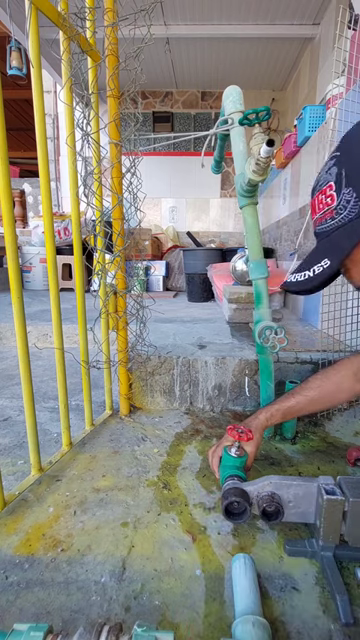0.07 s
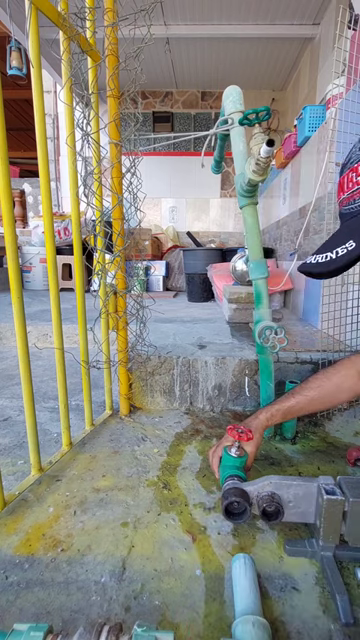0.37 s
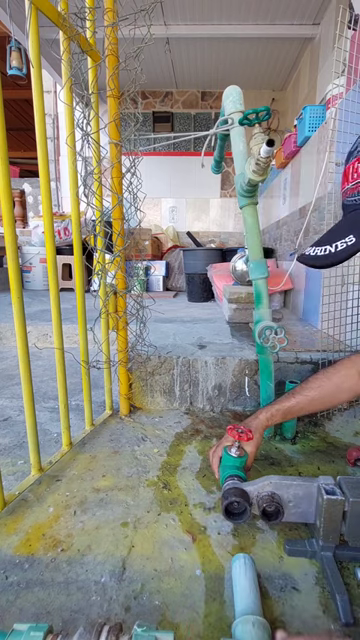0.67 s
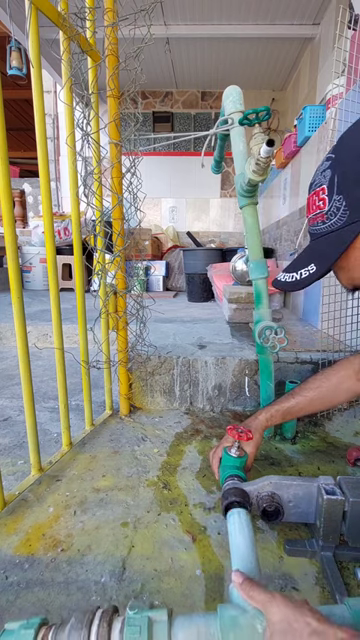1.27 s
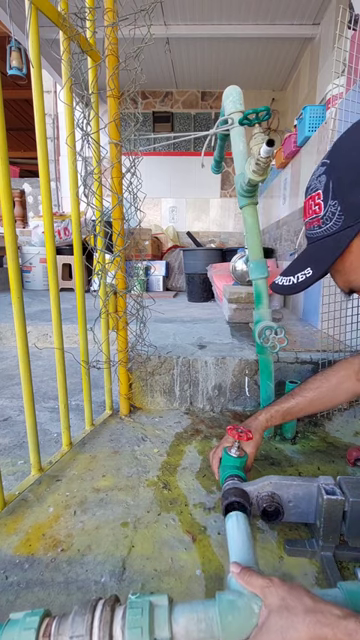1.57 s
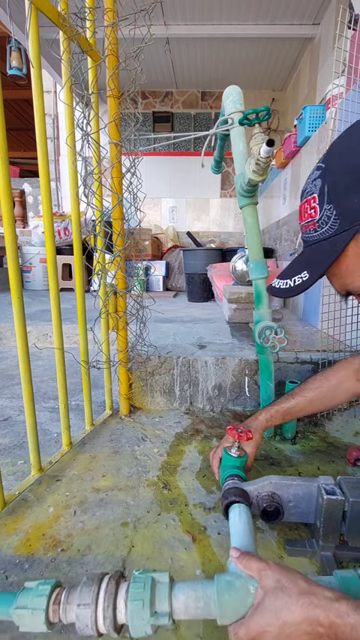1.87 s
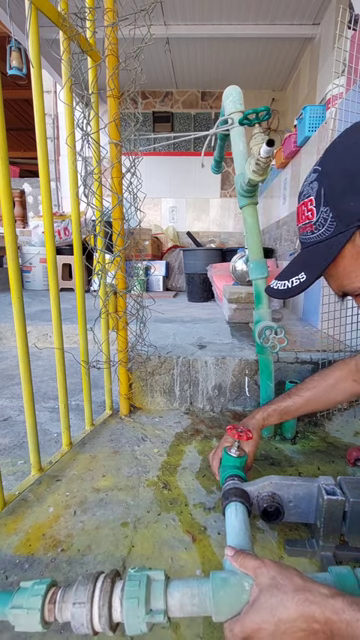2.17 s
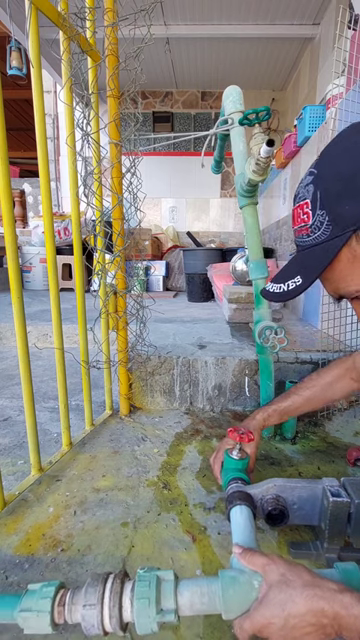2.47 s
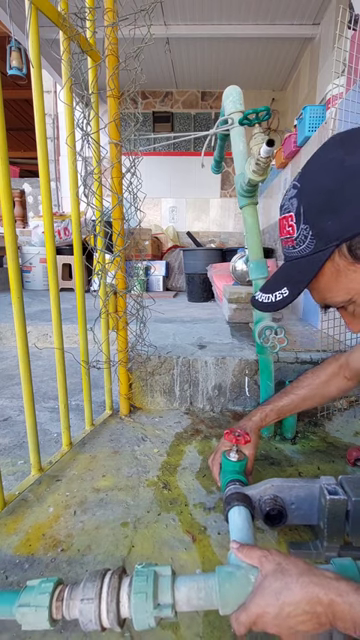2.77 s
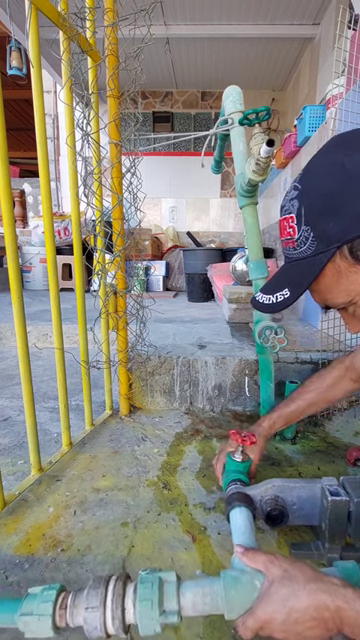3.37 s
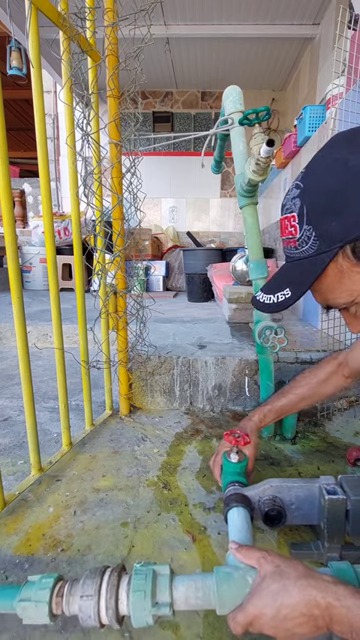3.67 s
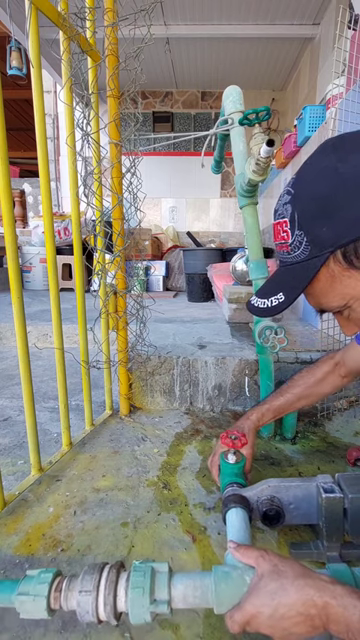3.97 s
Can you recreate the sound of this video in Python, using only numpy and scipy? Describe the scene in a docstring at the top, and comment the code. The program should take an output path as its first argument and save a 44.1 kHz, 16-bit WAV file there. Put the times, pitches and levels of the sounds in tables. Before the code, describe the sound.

A high, wavering hiss of water rushing into a plastic pipe follows some quiet handling: hollow knocks, a dull thump and the clack of a valve. It is heard up close in a roofed space with a low background rumble.

```python
"""Water let into a plastic pipe

A plastic pipe is pushed into a fitting on a concrete floor under a roof: scuffs, hollow knocks and a
thump as it seats, each blow exciting damped modes. A valve cracks open and air sputters out; turbulent
water hisses through the gap and drives the pipe's resonances. A low rumble lies underneath, with two
thin rising chirps and a faint level one, perhaps from a small bird."""
import sys
import numpy as np
from scipy import signal
from scipy.fft import rfft, irfft
from scipy.io import wavfile

SR = 44100
rng = np.random.default_rng(int(sys.argv[2]) if len(sys.argv) > 2 else 0)


def inscribe(sig):
    """Save sig as 16-bit PCM at rate SR to the path in sys.argv[1].

    A 1-D sig is mono; a 2-D sig holds one channel per row.
    Samples are clipped to [-1, 1] before scaling.
    """
    pcm = np.round(np.clip(np.atleast_2d(sig).T, -1, 1) * 32767)
    wavfile.write(sys.argv[1], SR, pcm.astype(np.int16))


N = 176400
T = np.arange(N) / SR
HZ = np.maximum(np.fft.rfftfreq(N, 1 / SR), 1)
CUTOFF_HZ = 15750
LAG_S = 0.000284   # valve and fitting are on the right, so the left hears them late

# Jet strength as the valve turns. Each row: time in seconds, treble and middle gains in dB.
JET_LEVELS = [(2.275, -60, -56.5), (2.326, -47.5, -57.5), (2.444, -36.5, -50), (2.5, -33.5, -46.5),
              (2.56, -30, -44.5), (2.665, -33.5, -49.5), (2.745, -29.5, -48), (2.82, -31.5, -45),
              (2.9, -32.5, -48), (3.02, -33, -49), (3.185, -41.5, -50.5), (3.285, -34.5, -50),
              (3.37, -35.5, -46.5), (3.46, -34.5, -51), (3.51, -38, -48.5), (3.6, -36.5, -51.5),
              (4, -38, -51.5)]
# Jet spectrum. Each row: frequency in Hz, relative density in dB.
JET_SPECTRUM = [(1000, -22.5), (2400, -20.5), (3250, -19.5), (3450, -10), (3700, -13.5), (4250, -9.5),
                (5750, -8.5), (6300, -8), (7600, -8.5), (8900, -7.5), (10900, -3.5), (12000, -3),
                (15600, 1)]
# Direction of the jet. Each row: frequency in Hz, left minus right in dB.
JET_PAN = [(3300, 1.5), (4400, -6.5), (6300, -3), (7700, -7.5), (8900, 2), (10000, -4.5), (13400, -11),
           (15500, -7)]
# Likeness of the jet's two sides. Each row: frequency in Hz, coherence from 0 to 1.
JET_COHERENCE = [(2000, 0.49), (5000, 0.61), (12000, 0.13), (16000, 0.39)]
# Resonances of the valve gap. Each row: frequency in Hz, width in Hz, relative level in dB.
GAP_MODES = [(6400, 110, -26.5), (10100, 280, -15.5), (11600, 50, -18), (11900, 58, -17), (13440, 120, -17)]
# The gap sings as the valve moves. Each row: centre and spread in seconds, pitch in Hz, level in dB.
GAP_SINGS = [(2.54, 0.069, 12500, -36), (2.79, 0.029, 12000, -35.5), (3.28, .035, 13000, -38)]
# Reflections off the floor and nearby pipes.
# Each row: left-side delay in seconds (the right's is 1.17 times longer), gain in dB.
REFLECTIONS = [(.0019, -17), (.0051, -15), (.0093, -16)]
# Turbulence inside the pipe. Each row: time in seconds, level in dB.
CHURN_LEVELS = [(2.26, -64), (2.33, -61.5), (2.46, -49), (2.56, -58), (2.7, -58), (2.78, -55),
                (3.08, -59.5), (3.2, -52), (3.26, -57.5), (3.33, -46), (3.41, -47), (3.5, -56),
                (3.57, -47.5), (3.72, -58.5), (4, -58.5)]
# Resonances of the pipe. Each row: frequency in Hz, width in Hz, relative level in dB.
PIPE_MODES = [(540, 130, -7.5), (600, 28, 4), (718, 34, 0.5), (750, 32, 2.5), (1000, 300, -14),
              (1230, 17, -3), (1539, 18, 2), (1817, 32, 6.5), (1930, 17, 3.5), (2660, 54, -5),
              (2825, 16, 0.5), (3015, 10, 3.5)]
# Air escaping ahead of the water. Each row: time in seconds, level in dB.
SPUTTER_LEVELS = [(2.27, -82), (2.3, -50.5), (2.34, -53.5), (2.355, -44.5), (2.375, -55.5), (2.485, -53.5),
                  (2.55, -89)]
# Blows: the pipe knocks on the fitting, it bottoms out in its socket, the valve breaks free.
# Each row: start in seconds, gain in dB, low-pass corner in Hz, pitch ratio.
FITTING_BLOWS = [(.959, -31.5, 3500, 1.12), (.9695, -42, 6000, 1.1), (.9995, -29.5, 1690, 1.0),
                 (1.0295, -38.5, 2800, 1.0), (1.037, -43, 900, 0.73), (3.065, -41, 2500, 0.66)]
SEATING_BLOWS = [(1.943, -30.5, 800, 0.96)]
VALVE_BLOWS = [(2.2185, -29.5, 6940, 0.95)]
# Their modes. Each row: frequency in Hz at pitch ratio 1, relative level in dB, 60 dB decay in seconds.
FITTING_MODES = [(380, -15.5, 0.084), (459, 2, 0.04), (557, 2.5, 0.018), (935, 4.5, 0.011),
                 (1150, -4, 0.0077), (2180, -4, 0.016), (2770, -12.5, 0.017)]
SEATING_MODES = [(195, -5, 0.18), (310.7, -2, 0.22), (369, -2, 0.063), (456, -8, 0.082), (600, 7, 0.0094),
                 (1020, -15, 0.062), (2400, -9, 0.05)]
VALVE_MODES = [(191.5, -6, 0.16), (695, -2, 0.019), (800, 7, 0.018), (1290, 1, 0.025), (1740, 4.5, 0.026),
               (2120, -6.5, 0.04), (2550, -13.5, 0.041)]
# Rubs of hands and plastic, and of the valve stem.
# Each row: start in seconds, 15 dB decay in seconds, level in dB.
SCUFF_STROKES = [(0.863, .05, -56), (0.926, 0.05, -54), (0.946, 0.065, -51.5), (1.088, 0.075, -56),
                 (1.238, 0.031, -62), (1.782, 0.023, -61), (1.875, 0.098, -60.5), (1.932, 0.012, -50.5),
                 (2.094, 0.47, -72.5), (2.204, 0.045, -49.5)]
STEM_STROKES = [(2.204, 0.018, -60), (2.219, 0.061, -58)]
# Scuff spectrum before its bass is cut. Each row: frequency in Hz, relative density in dB.
SCUFF_SPECTRUM = [(800, 4.5), (2500, -3.5), (4500, 1.5), (6500, 0.5), (8300, -9), (10000, -4), (12000, 1.5),
                  (15500, -1)]
# Impacts of grit and flying drops. Each row: start in seconds, level in dB.
TICK_HITS = [(0.931, -33), (0.9365, -33.5), (0.959, -48), (1.057, -47), (2.739, -20.5), (3.421, -18),
             (3.507, -18)]
# Shuffles of movement. Each row: centre and spread in seconds, pitch in Hz, level in dB.
SWISH_SWELLS = [(.12, 0.14, 5260, -69), (.17, 0.047, 360, -58), (.86, 0.072, 4660, -67.5),
                (1.245, 0.01, 4660, -64.5), (1.6, 0.075, 4960, -76.5), (1.63, 0.018, 143, -50.5),
                (2.135, .035, 6900, -68.5)]
# Chirps, one list for each. Each row: time in seconds, pitch in Hz, level in dB.
CHIRP_GLIDES = [
    [(0, 4570, -64), (.035, 5200, -61), (.065, 5310, -58.5), (.085, 5420, -74), (.13, 5350, -78)],
    [(.7, 4700, -87), (.74, 4720, -76.5), (.775, 4620, -75)],
    [(.79, 3750, -70.5), (.85, 4350, -70.5), (.9, 4660, -61), (.93, 5500, -63)],
]
# Spectra of the rumble and the faint hiss. Each row: frequency in Hz, relative density in dB.
RUMBLE_SPECTRUM = [(25, -40), (48, -2), (75, -3.5), (98, 2.5), (128, 1.5), (160, -5.5), (195, -2),
                   (260, -8.5), (420, -11.5), (700, -16.5), (1400, -22.5), (3000, -41.5)]
AIR_SPECTRUM = [(1500, -1), (3000, -7), (4600, 0), (6500, -1.5), (8500, -6.5), (10500, -5), (12500, 3),
                (15500, 0)]
# Swell of the rumble. Each row: time in seconds, relative level in dB.
RUMBLE_LEVELS = [(0, 0), (.4, -1.5), (.7, 0), (1.1, 2), (1.5, 0), (2.2, 1.5), (2.5, 6.5), (3.1, 3),
                 (4, 5.5)]
# Direction of the rumble. Each row: frequency in Hz, left minus right in dB.
RUMBLE_PAN = [(90, -6), (180, -4), (500, 2)]


def jet():
    """Turbulence in the valve gap radiates broadband noise; standing waves colour its lower part."""
    treble_db, middle_db = in_time(JET_LEVELS)
    colour = from_db(per_hz(JET_SPECTRUM))
    stereo = per_hz(JET_COHERENCE), per_hz(JET_PAN), LAG_S
    split_hz, mode_spacing_hz, end_reflection = 7690, 315.5, 0.25
    low_share = 1 / (1 + (HZ / split_hz) ** 12)
    standing_waves = 1 / abs(1 - end_reflection * delay(1 / mode_spacing_hz))
    hiss = noise(colour * np.sqrt(1 - low_share) * (HZ < CUTOFF_HZ), *stereo)
    rush = noise(colour * standing_waves * np.sqrt(low_share), *stereo)
    whistles = sum(from_db(db + 5.5 * drift(4.5)) * noise(resonances([(hz, width, 0)]), *stereo)
                   for hz, width, db in GAP_MODES)
    sings = sum(swell(s, spread, db) * noise(resonances([(hz, 2400, 0)]) ** 2, *stereo)
                for s, spread, hz, db in GAP_SINGS)
    drops = grains(per_s=200, low_hz=5170, high_hz=14700, cycles=12, spread_db=1.5)
    spray = from_db(-26) * placed(drops, pan_db=-24.5)
    treble = from_db(treble_db - 1.33) * (hiss + whistles + spray)
    middle = from_db(middle_db + 3.5) * rush
    opened = np.clip((T - JET_LEVELS[0][0]) / 0.025, 0, 1)
    return opened * early_reflections(flutter(treble + middle + sings))


def flutter(x):
    """Random amplitude modulation makes the hiss flicker, band by band and as a whole."""
    centres = np.linspace(0, CUTOFF_HZ, 16)
    bands = (np.clip(1 - abs(HZ - hz) / centres[1], 0, 1) for hz in centres)
    patchy = sum(filtered(x, band) * from_db(0.8 * drift(54)) for band in bands)
    return patchy * from_db(1.27 * drift(210))


def pipe_flow():
    """Forced resonance: turbulence drives the pipe's modes, and trapped air spits out first."""
    churn_db, = in_time(CHURN_LEVELS)
    sputter_db, = in_time(SPUTTER_LEVELS)
    body = noise(resonances(PIPE_MODES), coherence=0.42, pan_db=-1.5)
    body *= from_db(churn_db + 2.4 * drift(8.5))
    spits = grains(per_s=960, low_hz=1230, high_hz=2500, cycles=29, spread_db=2.5)
    sputter = placed(spits * from_db(sputter_db), pan_db=-8)
    return (body + sputter) * (T > CHURN_LEVELS[0][0])


def struck(blows, modes, crack_db, crack_s, lowest_hz):
    """Impact excites damped modes and a crack of contact noise; the body radiates little bass."""
    contact_s = 0.00046
    out = np.zeros(N)
    for s, db, bright_hz, pitch in blows:
        start = int(s * SR)
        t = T[:min(N - start, SR // 2)]
        body = sum(from_db(level + rng.normal(0, 1) - 60 * t / t60) * np.sin(2 * np.pi * hz * pitch * t)
                   for hz, level, t60 in modes)
        crack = from_db(crack_db) * rng.standard_normal(len(t)) * np.exp(-t / crack_s)
        blow = (body + crack) * (1 - np.exp(-t / contact_s))
        pole = np.exp(-2 * np.pi * bright_hz / SR)
        out[start:start + len(t)] -= from_db(db) * signal.lfilter([1 - pole], [1, -pole], blow)
    return signal.sosfilt(signal.butter(2, lowest_hz, "high", fs=SR, output="sos"), out)


def scuffs():
    """Sliding friction of hands and plastic gives short strokes of grainy noise."""
    colour = from_db(per_hz(SCUFF_SPECTRUM)) / (1 + (595 / HZ) ** 2)
    rubs = noise(colour, coherence=0.063, pan_db=-6.5) * strokes(SCUFF_STROKES)
    return rubs * from_db(3 * drift(200))


def ticks():
    """Brief impacts have wide spectra: grit and drops give bright, fast-decaying bursts."""
    decay_s, lowest_hz = 0.00066, 7400
    colour = from_db(per_hz(SCUFF_SPECTRUM)) / (1 + (595 / HZ) ** 2) / (1 + (lowest_hz / HZ) ** 4)
    bursts = sum(from_db(db) * np.exp(-np.clip((T - s) / decay_s, 0, 40)) * (T >= s)
                 for s, db in TICK_HITS)
    return noise(colour, coherence=0.21, pan_db=-13) * bursts


def stem_squeak():
    """Friction excites one narrow, high resonance as the valve stem starts to turn."""
    return noise(resonances([(13800, 350, 0)]), coherence=0.21, lag_s=0) * strokes(STEM_STROKES)


def swishes():
    """Things moved about give soft swells of band-limited noise."""
    return sum(swell(s, spread, db) * noise(resonances([(hz, 0.78 * hz, 0)]) ** 2, 0.37, lag_s=0)
               for s, spread, hz, db in SWISH_SWELLS)


def chirps():
    """Random modulation widens a gliding tone: the rising chirps are rough, the level one cleaner."""
    out = np.zeros(N)
    for rows, width_hz in zip(CHIRP_GLIDES, (220, 50, 160)):
        hz, db = in_time(rows)
        phase = 2 * np.pi * np.cumsum(hz) / SR
        gate = np.clip(np.minimum(T - rows[0][0], rows[-1][0] - T) / 0.0026, 0, 1)
        tone = drift(width_hz) * np.sin(phase) + drift(width_hz) * np.cos(phase)
        out += gate * from_db(db) * unit_power(tone)
    return out


def early_reflections(x):
    """Interference with delayed copies combs the spectrum, differently on each side."""
    delay_ratios = np.array([[1], [1.17]])   # left, right
    return filtered(x, 1 + sum(from_db(db) * delay(s * delay_ratios) for s, db in REFLECTIONS))


def room(x):
    """Reverberation: dense, dull reflections from floor, walls and roof decay exponentially."""
    t60_s, onset_s, dull_hz = 0.23, 0.0086, 5500
    t = T[:SR]
    tail = rng.standard_normal((2, SR)) * from_db(-60 * t / t60_s) * (t > onset_s)
    tail = tail + .5 * tail[::-1]   # each side takes in some of the other
    tail = signal.lfilter(*signal.butter(1, dull_hz, fs=SR), tail)
    tail /= np.sqrt(np.sum(tail ** 2) / 2 * SR / (np.pi * dull_hz))
    return from_db(-9) * signal.fftconvolve(x, tail, axes=1)[:, :N]


def background():
    """Ambient noise: a low rumble, coherent between the sides, and a faint diffuse hiss."""
    swell_db, = in_time(RUMBLE_LEVELS)
    colour = from_db(per_hz(RUMBLE_SPECTRUM)) * (HZ > 15) / (1 + (HZ / 3500) ** 4)
    rumble = noise(colour, coherence=0.95 / (1 + (HZ / 1800) ** 2), pan_db=per_hz(RUMBLE_PAN))
    air = noise(from_db(per_hz(AIR_SPECTRUM)), coherence=0.035, pan_db=-3)
    return rumble * from_db(swell_db - 55.5) + air * from_db(-68)


def noise(gain, coherence, pan_db=0, lag_s=LAG_S):
    """Partly coherent stereo noise; the shared part reaches the left side lag_s late."""
    shared = rfft(rng.standard_normal(N)) * np.array([delay(lag_s), delay(0)])
    own = rfft(rng.standard_normal((2, N)))
    both = np.sqrt(coherence) * shared + np.sqrt(1 - coherence) * own
    sides = from_db(np.array([[.5], [-.5]]) * pan_db)
    return unit_power(irfft(both * gain * sides, N))


def resonances(rows):
    """Gain of second-order resonators whose powers add."""
    return np.sqrt(sum(from_db(db) ** 2 / (1 + ((HZ ** 2 - hz ** 2) / (HZ * width)) ** 2)
                       for hz, width, db in rows))


def ring(clicks, hz, t60):
    """A resonator answers each impulse with a damped sine."""
    r, w = from_db(-60 / (t60 * SR)), 2 * np.pi * hz / SR
    return signal.lfilter([0, np.sin(w)], [1, -2 * r * np.cos(w), r * r], clicks + 1e-18)


def grains(per_s, low_hz, high_hz, cycles, spread_db):
    """Shot noise: each random impulse rings one of 16 resonators."""
    sizes = from_db(spread_db * np.minimum(rng.exponential(1, N), 4))
    clicks = sizes * rng.choice([-1, 1], N) * (rng.random(N) < per_s / SR)
    chosen = rng.integers(0, 16, N)
    pitches = np.geomspace(low_hz, high_hz, 16)
    return unit_power(sum(ring(clicks * (chosen == k), hz, cycles / hz) for k, hz in enumerate(pitches)))


def strokes(rows):
    """Envelope of rubs: a quick rise, then exponential decay."""
    return sum(from_db(db - 15 * np.maximum(T - s, 0) / length) * np.clip((T - s) / 0.0024, 0, 1)
               for s, length, db in rows)


def swell(centre_s, spread_s, db):
    """Gaussian envelope."""
    return from_db(db) * np.exp(-.5 * ((T - centre_s) / spread_s) ** 2)


def drift(corner_hz):
    """Low-passed random fluctuation of unit power."""
    return unit_power(filtered(rng.standard_normal(N), 1 / (1 + (HZ / corner_hz) ** 2)))


def placed(x, pan_db, lag_s=LAG_S):
    """Direction from differences of level and arrival time."""
    return np.array([np.interp(T - lag_s, T, x) * from_db(pan_db / 2), x * from_db(-pan_db / 2)])


def delay(s):
    """A delay shifts phase in proportion to frequency."""
    return np.exp(-2j * np.pi * HZ * s)


def filtered(x, gain):
    """Filtering multiplies the spectrum."""
    return irfft(rfft(x) * gain, N)


def in_time(rows):
    """Each column of a curve at every sample."""
    s, *columns = np.transpose(rows)
    return [np.interp(T, s, c) for c in columns]


def per_hz(points):
    """A spectrum table at every frequency."""
    hz, value = np.transpose(points)
    return np.interp(np.log(HZ), np.log(hz), value)


def from_db(db):
    """Decibels to gain."""
    return 10 ** (np.asarray(db) / 20)


def unit_power(x):
    """Scale to a mean square of 1."""
    return x / np.sqrt(np.mean(x ** 2) + 1e-20)


def scene():
    """Superposition: handling first, then the water, over the background."""
    knocks = struck(FITTING_BLOWS, FITTING_MODES, crack_db=-15.5, crack_s=0.019, lowest_hz=354)
    thump = struck(SEATING_BLOWS, SEATING_MODES, crack_db=-6.5, crack_s=0.032, lowest_hz=171)
    clack = struck(VALVE_BLOWS, VALVE_MODES, crack_db=-11, crack_s=0.0074, lowest_hz=201)
    near = placed(knocks, pan_db=2) + placed(thump, pan_db=-3) + placed(clack, pan_db=-3.5)
    near += placed(chirps(), pan_db=0, lag_s=0) + scuffs() + ticks() + stem_squeak()
    return near + room(near) + jet() + pipe_flow() + swishes() + background()


def record(dry):
    """A steep low-pass filter limits the bandwidth."""
    return signal.sosfilt(signal.ellip(12, .1, 80, CUTOFF_HZ, fs=SR, output="sos"), dry)


dry = scene()
out = record(dry)
inscribe(out)
```